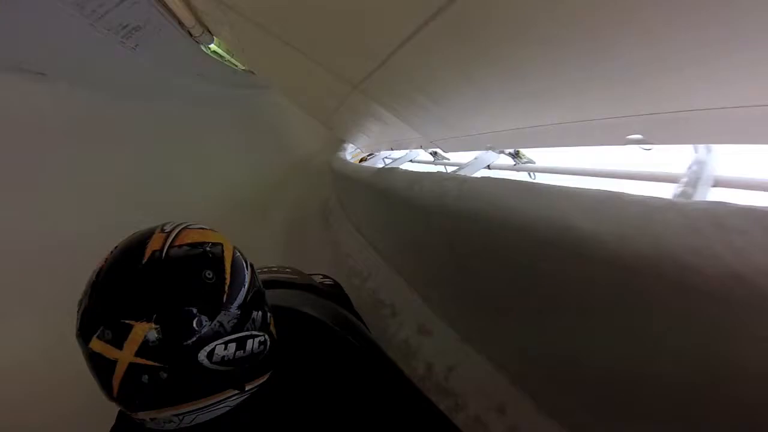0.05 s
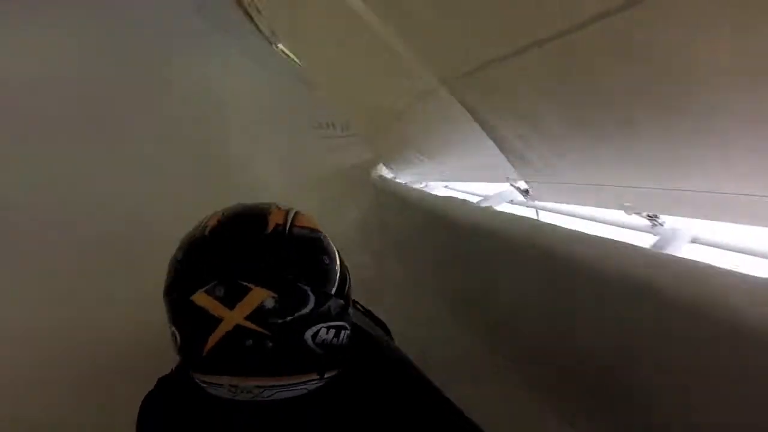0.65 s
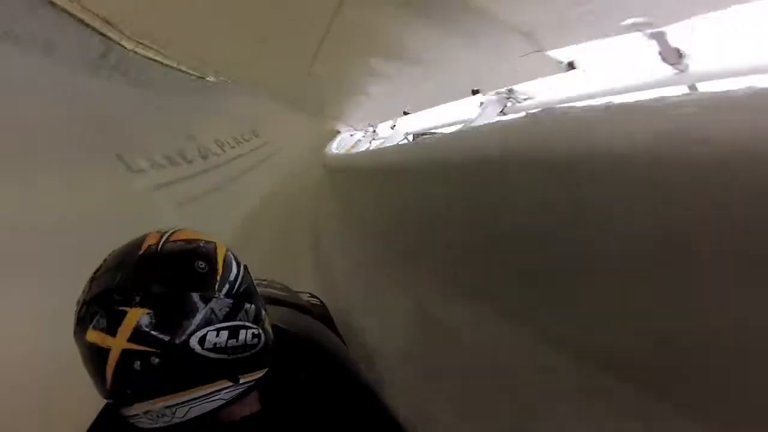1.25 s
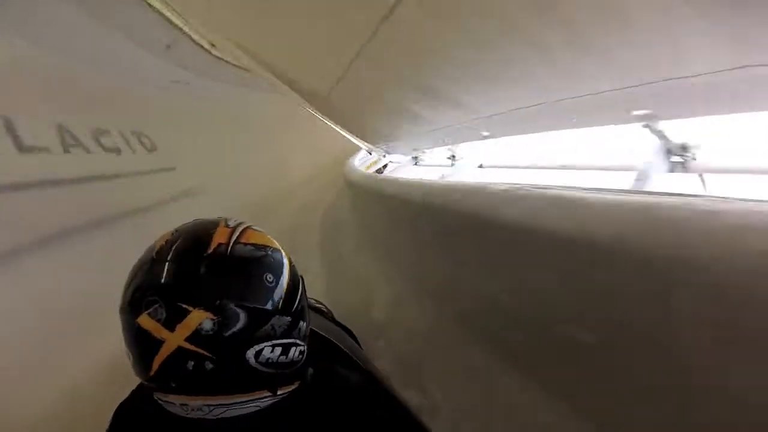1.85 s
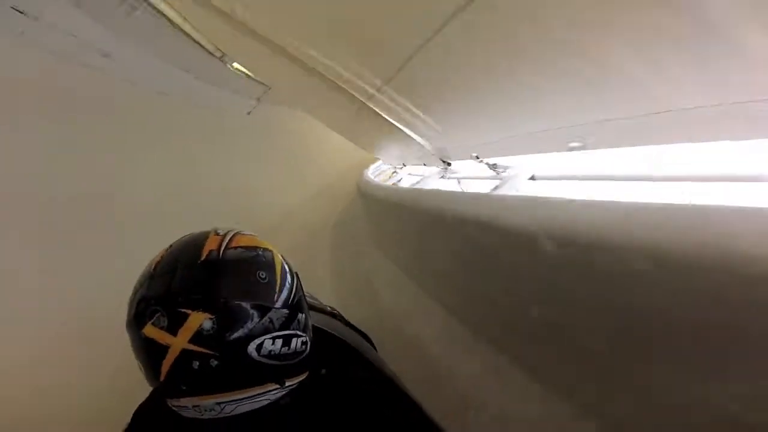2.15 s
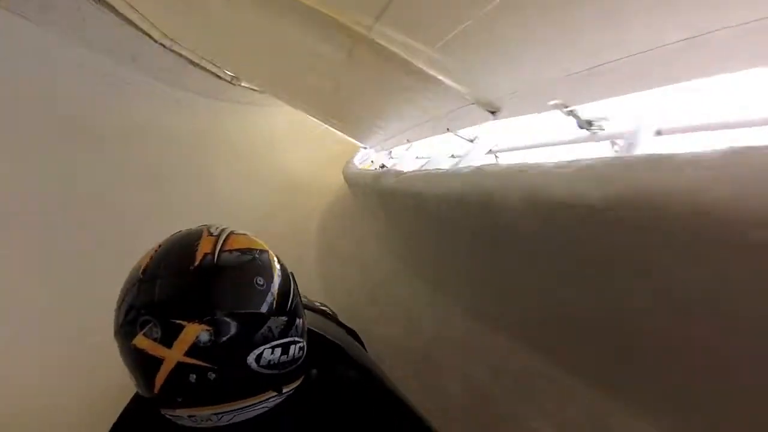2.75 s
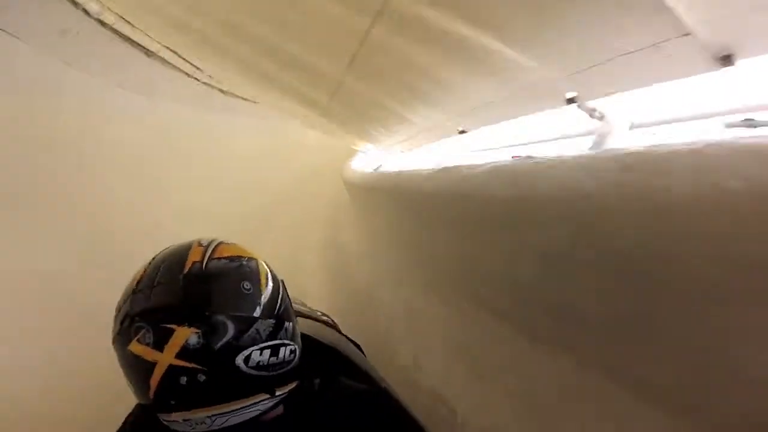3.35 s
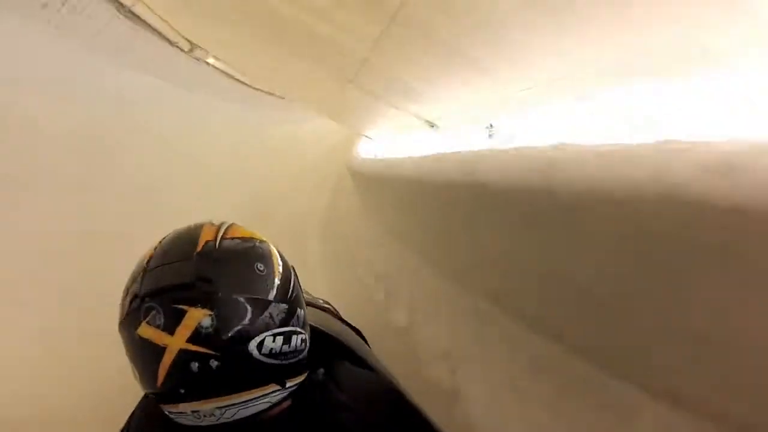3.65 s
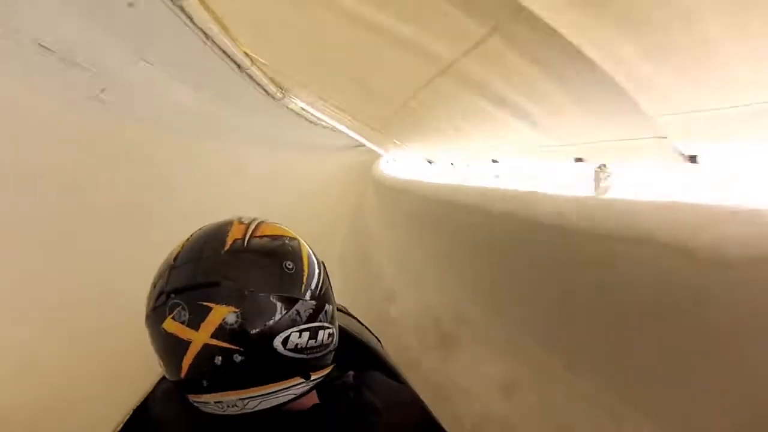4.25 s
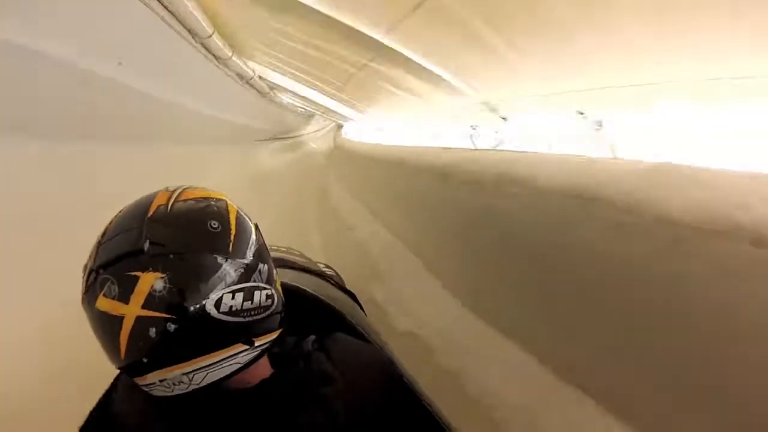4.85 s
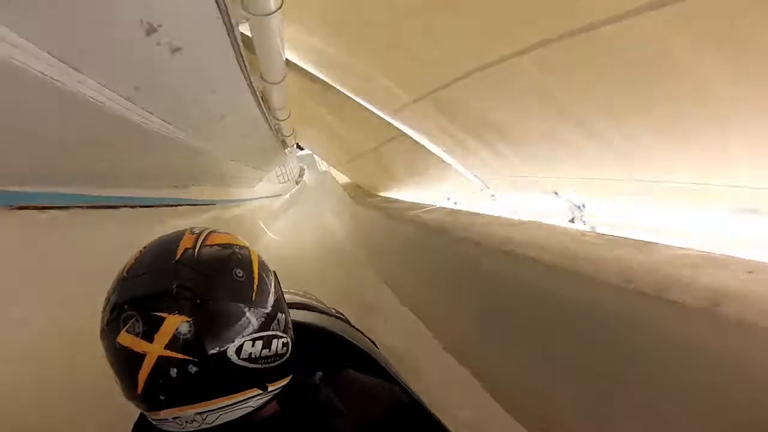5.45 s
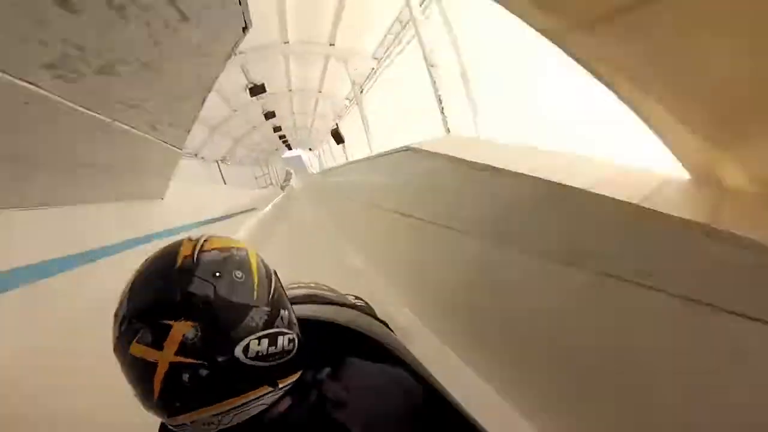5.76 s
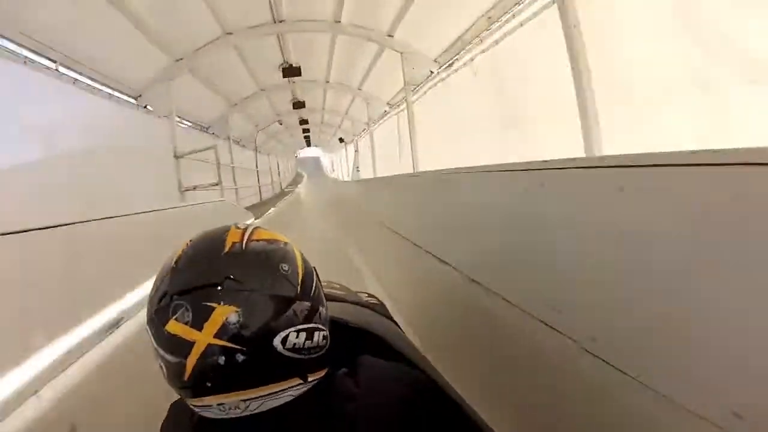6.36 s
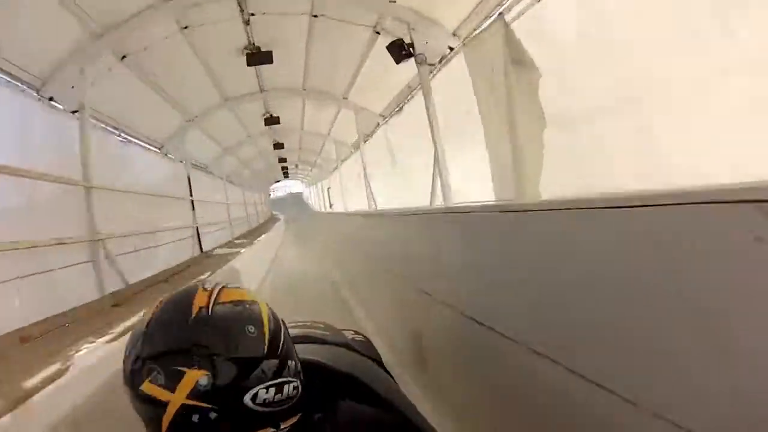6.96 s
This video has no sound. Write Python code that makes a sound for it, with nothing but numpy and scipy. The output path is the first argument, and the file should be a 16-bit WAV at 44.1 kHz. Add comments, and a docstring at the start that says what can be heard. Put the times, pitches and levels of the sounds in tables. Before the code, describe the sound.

A bobsled runs down an icy track, steel runners grinding and skidding over a low rumble, with rattles and heavy thumps in the second half.

```python
"""An iced bobsled track, heard from a camera on the running sled. Steel runners grind over the ice, skid,
squeal and make the shell ring; ice chips tick on the blades. Loose fittings rattle; the hull sways, heaves and
rumbles in the airstream. From 3 s on, bumps jolt the sled, and the ice sounds and buffet dip after them. The
camera's gain ducks after loud peaks."""
import sys
import numpy as np
from scipy import signal
from scipy.fft import rfft, irfft, next_fast_len
from scipy.io import wavfile
from scipy.ndimage import uniform_filter1d, minimum_filter1d, map_coordinates

SR = 44100
rng = np.random.default_rng(int(sys.argv[2]) if len(sys.argv) > 2 else 0)


def put_to_file(sound):
    """Save the sound as 16-bit audio at rate SR, in the file named by the first command-line argument."""
    columns = np.atleast_2d(sound).T  # one column per channel
    safe = np.clip(columns, -1, 1)
    whole_steps = np.round(safe * 32767)
    wavfile.write(sys.argv[1], SR, whole_steps.astype(np.int16))


N = 308700
T = np.arange(N) / SR
FFT_SIZE = next_fast_len(N + SR // 2, real=True)
HZ = np.fft.rfftfreq(FFT_SIZE, 1 / SR)

# steady glide: t/s, shell ring/dB, ice hiss/dB
GLIDE_LEVELS = [(0, -39.5, -42), (.4, -33.5, -37.5), (.7, -38, -43.5), (1.5, -40.5, -47), (2.25, -38, -44),
                (2.9, -37.5, -43.5), (3.5, -36, -40), (3.8, -38, -45), (4.3, -32.5, -35.5), (5, -34.5, -37),
                (5.6, -32.5, -35), (6.1, -37.5, -37.5), (6.6, -30.5, -33.5), (7, -38, -40)]
# shell modes: f/Hz, width/Hz, level/dB
SHELL_MODES = [(889, 12, -6.5), (1161, 85, -7.5), (1401, 245, -2.5), (1561, 208, 1.5), (1900, 474, -8),
               (2296, 240, -5), (2788, 112, -15)]
# steel runner modes: f/Hz, width/Hz, lift/dB
RUNNER_MODES = [(3680, 1360, 7.2), (4920, 305, 11.5), (5390, 96, 6.5), (6720, 580, 9), (7990, 750, 5.4),
                (11860, 140, 2.8)]
# shaved ice: f/Hz, level/dB
ICE_SPECTRUM = [(150, 12.5), (350, 6), (600, 1.5), (1000, 5), (2400, 9), (3000, 0.5), (4300, -4.5),
                (6000, -10), (8200, -14.5), (9500, -21), (13000, -24.5), (15500, -39)]
# fine spray re ice hiss: t/s, level/dB
SPRAY_LEVELS = [(0, -27), (.35, -21), (.5, -17), (.8, -18), (1.1, -20), (2.3, -19), (4.3, -21.5),
                (4.9, -19), (5.6, -19.5), (6.4, -15), (7, -14.5)]
# fine spray: f/Hz, level/dB
SPRAY_SPECTRUM = [(5000, -38), (7500, 8.5), (8800, 3), (10000, -1.5), (12000, 0.5), (15000, -18)]
# rumble, swelling with speed and load: t/s, sway/dB, buffet/dB
RUMBLE_LEVELS = [(0, -13, -30.5), (.28, -28, -30), (.85, -23, -29.5), (1.15, -34.5, -32.5),
                 (1.6, -29.5, -32.5), (2.15, -26, -30), (2.75, -27.5, -32), (3.1, -27.5, -32.5),
                 (3.8, -22.5, -29.5), (5, -26.5, -28), (5.6, -20.5, -27), (7, -20, -25.5)]
# hull sway: f/Hz, level/dB
SWAY_SPECTRUM = [(8, -14), (20, -10), (29, -6.5), (36, 2), (45, -10), (62, -29.5), (110, -69), (250, -76)]
# airstream buffet: f/Hz, level/dB
BUFFET_SPECTRUM = [(30, 4), (58, -5), (76, -1.5), (98, -4), (130, 2.5), (160, -4), (215, -9.5),
                   (290, -18.5), (450, -22.5), (900, -23), (3000, -55)]
# hull heaves over soft dips: crest t/s, level/dB
HULL_HEAVES = [(.11, -17), (.39, -18), (.62, -17.5), (.98, -20), (1.25, -24.5), (1.87, -22), (2.17, -19),
               (2.47, -21), (2.89, -21), (3.23, -17.5), (3.41, -19.5), (3.96, -18), (4.25, -29), (4.7, -22)]
# blade edge ring: t/s, level/dB
SIZZLE_LEVELS = [(0, -77), (1.4, -81), (1.85, -69), (2.4, -80), (3.6, -69), (4.7, -67), (5.3, -78)]
# knocks of loose fittings: t/s, strength/dB
FITTING_KNOCKS = [(.1351, -23), (.2244, -17), (0.2947, -23), (.465, -23), (.4916, -22), (1.5943, -22),
                  (1.881, -22), (2.051, -17), (2.3064, -10.5), (2.405, -20), (2.617, -16), (2.8529, -20.5),
                  (2.9645, -13), (3.049, -13.5), (3.2745, -23.5), (3.3523, -14.5), (3.5356, -17.5),
                  (3.649, -19.5), (3.751, -20.5), (4.011, -24), (4.4036, -6), (4.775, -21), (4.8543, -17.5),
                  (5.0437, -14), (5.2855, -17.5), (5.464, -14), (5.9836, -19), (6.2644, -22)]
# fitting modes: f/Hz, level/dB
FITTING_MODES = [(1450, -6), (1560, 11), (2000, -1.5), (2320, -1)]
# sideways skids: t/s, length/s, shell ring/dB, shaving/dB
RUNNER_SKIDS = [(0.286, .055, -25.5, -28), (0.372, 0.043, -32, -44), (0.482, 0.049, -26.5, -31),
                (1.363, 0.024, -36, -35.5), (2.301, 0.046, -33, -32.5), (2.476, 0.02, -32.5, -34),
                (2.521, 0.084, -42, -36), (2.76, 0.14, -39, -39.5), (2.931, 0.019, -28.5, -28.5),
                (2.964, 0.059, -25.5, -32.5), (3.047, 0.013, -30, -30), (3.162, 0.028, -32.5, -32.5),
                (3.356, 0.019, -20, -19), (3.903, .04, -28, -36), (4.009, 0.046, -23, -29.5),
                (4.395, 0.079, -25, -29.5), (4.715, 0.036, -33, -34), (4.769, 0.035, -22.5, -29),
                (5.027, 0.116, -27.5, -32), (5.283, 0.018, -36, -35), (5.345, 0.11, -25, -28),
                (5.459, 0.034, -38, -26.5), (5.67, 0.032, -28.5, -29.5), (5.788, 0.073, -29, -31.5),
                (5.94, 0.04, -31, -37.5), (6.17, 0.091, -34, -38), (6.492, 0.074, -27, -28),
                (6.657, 0.13, -31.5, -31)]
# a blade sticks and sings: t/s, f/Hz, level/dB, length/s
BLADE_SQUEALS = [(0.294, 5100, -39, .032), (.51, 8150, -46.5, 0.061), (1.363, 4930, -43, 0.048),
                 (2.296, 6160, -45, 0.059), (2.321, 4880, -33.5, .022), (2.948, 5408, -39, 0.082),
                 (3.04, 11900, -52.5, .026), (3.351, 6900, -35, 0.039), (4.455, 6700, -41.5, 0.054),
                 (5.356, 5020, -31.5, 0.03), (5.466, 6500, -43.5, 0.029)]
# track bumps: t/s, level/dB, contact/s, dip afterwards/dB
BUMPS = [(3.059, -1, 0.0011, 9.5), (3.198, -8, .0019, 5.5), (3.402, -17.5, 0.00087, -2.5),
         (3.785, -3, 0.0013, 2.5), (3.929, -12, 0.0046, 2.5), (4.103, -5.5, 0.0026, 8.5),
         (4.24, -8.5, .0044, 5.5), (4.526, -3.5, 0.0015, 7.5), (4.8572, 0.5, 0.0017, 3),
         (5.155, -1.5, 0.0015, 9), (5.426, -14, 0.0015, 2.5), (5.477, -8.5, 0.0026, 2),
         (5.5771, -4.5, 0.0018, 4.5), (5.707, -9, 0.0042, 3.5), (5.8675, -5, 0.0034, 1.5),
         (6.0071, -4, 0.0017, 8.5), (6.27, -4.5, 0.0016, 5), (6.3888, -5.5, 0.0014, 3.5),
         (6.591, -4.5, 0.0023, 0), (6.750, -2.5, 0.0014, 15.5), (6.9176, -5, 0.0013, 8.5)]
# hull modes, heave first, then panels: f/Hz, width/Hz, level/dB
HULL_MODES = [(39.6, 10.2, 7), (77, 25, 2.5), (123.3, 52, 8), (206, 42, -7), (495, 320, -12)]
# ticks on the camera housing: t/s, level/dB
HOUSING_TICKS = [(4.238, -36), (5.7076, -19), (6.747, -27), (6.751, -34)]
# housing tick: f/Hz, level/dB
TICK_SPECTRUM = [(1000, -28), (4500, -3), (9500, -12.5), (11200, -5.5), (12400, -2), (13300, -14),
                 (15500, -24)]


def amp(db):
    """Decibels to gain."""
    return 10 ** (np.asarray(db) / 20)


def unit(x):
    """Scale to rms 1."""
    return x / np.sqrt(np.mean(x ** 2) + 1e-20)


def curves(rows):
    """One value per sample for each column after the time."""
    times_s, *columns = np.transpose(rows)
    return [np.interp(T, times_s, column) for column in columns]


def wobble(rate_hz):
    """Smooth random curve, rate_hz knots a second."""
    return map_coordinates(rng.standard_normal(int(N * rate_hz / SR) + 4), [T * rate_hz])


def colour(spectrum):
    """Gain of an (f/Hz, level/dB) table, interpolated over log f."""
    hz, db = np.transpose(spectrum)
    return amp(np.interp(np.log(HZ + 1), np.log(hz), db))


def resonance(hz, width_hz):
    """Causal response of one damped mode."""
    return 1j * HZ * width_hz / (hz * hz - HZ * HZ + 1j * HZ * width_hz)


def body(modes):
    """Response of a set of modes; neighbours swing in antiphase."""
    return sum((-1) ** k * amp(db) * resonance(hz, width_hz)
               for k, (hz, width_hz, db) in enumerate(modes))


def filtered(x, response):
    """x through a frequency response."""
    return irfft(rfft(x, FFT_SIZE) * response, FFT_SIZE)[:N]


def noise(response):
    """White noise through a frequency response."""
    return filtered(rng.standard_normal(N), response)


def steadied(x, give):
    """Flatten the envelope of x, more so for small give; rms 1."""
    analytic = signal.hilbert(x, FFT_SIZE)[:N]
    envelope = np.abs(analytic)
    return unit(analytic.real / (envelope + give * envelope.mean()))


def add(track, at_s, sound):
    """Mix sound into track from at_s on."""
    part = track[max(round(at_s * SR), 0):][:len(sound)]
    part += sound[:len(part)]


def grit(rate_hz, spread_db=0):
    """Random impacts of ice grains; spread_db widens their range of sizes."""
    hits = rng.random(N) < rate_hz / SR
    return unit(hits * rng.standard_normal(N) * amp(spread_db * rng.standard_normal(N)))


def ice_colour():
    """Spectrum of shaved ice, lifted at the runner modes."""
    lifts = [1 + (amp(db) - 1) * resonance(hz, width_hz) for hz, width_hz, db in RUNNER_MODES]
    return colour(ICE_SPECTRUM) * np.prod(lifts, axis=0)


def ice_cut():
    """Gain of all ice cutting, glide plus skids."""
    _, hiss_db = curves(GLIDE_LEVELS)
    _, shaving_gain = skid_pressure()
    return np.hypot(amp(hiss_db), shaving_gain)


def runners(ridge_rate_hz=35, ridge_decay_s=0.013):
    """Runners chatter over rough ice: grains ring the shell, hiss at the blade and spray off."""
    ring_db, hiss_db = curves(GLIDE_LEVELS)
    spray_db, = curves(SPRAY_LEVELS)
    chatter = wobble(60)
    ridges = (rng.random(N) < ridge_rate_hz / SR) * rng.uniform(0.47, 1, N)
    bite = 1 + 0.3 * signal.lfilter([1], [1, -np.exp(-1 / (ridge_decay_s * SR))], ridges)
    ring_grains = grit(rate_hz=3500) * bite * amp(0.21 * chatter)
    hiss_grains = grit(rate_hz=9000) * np.sqrt(bite) * amp(0.59 * chatter + 0.79 * wobble(55))
    spray_grains = grit(rate_hz=6800, spread_db=1) * amp(2.7 * wobble(45))
    ring = unit(filtered(ring_grains, body(SHELL_MODES)))
    hiss = unit(filtered(hiss_grains, ice_colour()))
    spray = unit(filtered(spray_grains, colour(SPRAY_SPECTRUM)))
    return amp(ring_db) * ring + amp(hiss_db) * hiss + ice_cut() * amp(spray_db) * spray


def rumble(heave_s=0.14, drum_db=-1):
    """The hull sways and heaves on its runners; the airstream buffets it and skids drum on it."""
    sway_db, buffet_db = curves(RUMBLE_LEVELS)
    heave = np.zeros(N)
    for crest_s, db in HULL_HEAVES:
        add(heave, crest_s - heave_s / 2, amp(db) * signal.windows.hann(int(heave_s * SR)))
    sway = steadied(noise(colour(SWAY_SPECTRUM)), give=1)
    gusts = rng.standard_normal(N) * amp(2.5 * wobble(22))
    buffet = unit(filtered(gusts, colour(BUFFET_SPECTRUM)))
    ring_gain, _ = skid_pressure()
    drumming = amp(drum_db) * ring_gain
    return np.hypot(amp(sway_db), heave) * sway + np.hypot(amp(buffet_db), drumming) * buffet * duck_after_bumps()


def sizzle():
    """A blade edge rings thinly, coming and going with the ice."""
    level_db, = curves(SIZZLE_LEVELS)
    edge = noise(resonance(hz=12030, width_hz=300) ** 2)
    return amp(level_db) * unit(edge * amp(4.3 * wobble(28)))


def chips(count=260, rise_s=0.00054, t60_s=0.029):
    """Loose ice chips tick against the blades; small ones sound higher and fainter."""
    out = np.zeros(N)
    t = T[:SR // 40]
    envelope = (1 - np.exp(-t / rise_s)) * amp(-60 * t / t60_s)
    for when, pitch, softness in rng.random((count, 3)):
        hz = 5000 + 8000 * pitch
        db = -1.5 - 13 * pitch - 8 * softness
        add(out, when * N / SR, amp(db) * envelope * np.sin(2 * np.pi * hz * t))
    return ice_cut() * out


def faint_knocks(count, over_ring_db=8.5):
    """Small ridges jog the fittings at random, harder in a rough glide. Rows: t/s, strength/dB."""
    times_s, ring_db, _ = np.transpose(GLIDE_LEVELS)
    last_s = T[-SR // 10]
    return [(when * last_s, np.interp(when * T[-1], times_s, ring_db) + over_ring_db + 5 * size)
            for when, size in rng.random((count, 2))]


def rattles(rise_s=0.001, ring_t60_s=0.055, buzz_t60_s=0.084):
    """A ridge scuffs a runner; a loose fitting strikes, rings and buzzes against the shell."""
    out = np.zeros(N)
    buzz = steadied(noise(body(SHELL_MODES)), give=0.47)
    scuff = unit(noise(ice_colour()))
    rasp = buzz + amp(-9.5) * scuff
    t = T[:SR // 12]
    attack = 1 - np.exp(-t / rise_s)
    for at_s, db in list(FITTING_KNOCKS) + faint_knocks(count=20):
        ring = np.zeros(len(t))
        for hz, mode_db in FITTING_MODES:  # each contact reweights and detunes the modes
            gain = amp(mode_db + rng.normal(0, 5.4))
            ring += gain * np.sin(2 * np.pi * (hz * rng.normal(1, 0.02) * t + rng.random()))
        # little play: hard knocks ring no louder but buzz more
        strike = amp(min(db - 8, -16) - 60 * t / ring_t60_s) * unit(ring)
        chatter = amp(db - 9 - 60 * t / buzz_t60_s) * rasp[int(at_s * SR):][:len(t)]
        add(out, at_s, attack * (strike + chatter))
    return out


def skid_pressure(bite_share=0.18, sag_db=2.5, release_s=0.024):
    """Gains of shell ring and shaving: each skid bites, sags as it grips and lets go."""
    ring_gain, shaving_gain = np.zeros(N), np.zeros(N)
    t = T[:SR // 2]
    for at_s, length_s, ring_db, shaving_db in RUNNER_SKIDS:
        bite = 1 - np.exp(-t / (bite_share * length_s))
        sag = amp(-sag_db * np.minimum(t / length_s, 1))
        release = np.exp(-np.maximum(t - length_s, 0) / release_s)
        envelope = bite * sag * release
        add(ring_gain, at_s, amp(ring_db) * envelope)
        add(shaving_gain, at_s, amp(shaving_db) * envelope)
    return ring_gain, shaving_gain


def glinting(x, spread_db=3):
    """Brief rings at shifting pitches stand out of x as the contact moves along a blade; rms 1."""
    spectra = signal.stft(x, nperseg=512)[2]
    patches = uniform_filter1d(rng.standard_normal(spectra.shape), size=3, axis=0)
    patches = uniform_filter1d(patches, size=4, axis=1)
    return unit(signal.istft(spectra * amp(spread_db * unit(patches)), nperseg=512)[1][:N])


def skids():
    """A runner judders sideways: it shaves ice, rings the shell and crunches through the hull."""
    ring_gain, shaving_gain = skid_pressure()
    shaving = glinting(noise(ice_colour()))
    ring = glinting(filtered(grit(rate_hz=2500, spread_db=2.5), body(SHELL_MODES)))
    crunch = unit(noise(resonance(hz=560, width_hz=350)))
    judder = unit(amp(1.92 * wobble(120)))
    return judder * (ring_gain * ring + shaving_gain * (shaving + amp(-14.5) * crunch))


def squeals():
    """Stick-slip drives one blade mode; the ring keeps breaking off and restarting."""
    out = np.zeros(N)
    slips = wobble(380) + 1j * wobble(380)
    for at_s, hz, db, length_s in BLADE_SQUEALS:
        n = int(length_s * SR)
        ring = np.real(slips[int(at_s * SR):][:n] * np.exp(2j * np.pi * hz * T[:n]))
        add(out, at_s, amp(db) * signal.windows.hann(n) * ring)
    return out


def jolts(foot_ahead_s=0.01933, foot_db=-8.5, foot_contact_s=0.0042, crack_t60_s=0.028):
    """A bump pushes the hull softly, then hard. Short contacts thud higher; hard ones crack the joints."""
    out, strain = np.zeros(N), np.zeros(N)
    heave, *panels = [amp(db) * resonance(hz, width_hz) for hz, width_hz, db in HULL_MODES]
    ring = irfft(sum(panels) - heave, FFT_SIZE)[:SR // 4]  # panels spring out against the heave
    lead_s = 0.02
    from_peak_s = T[:round(2 * lead_s * SR)] - lead_s
    feet = [(at_s - foot_ahead_s, db + foot_db, foot_contact_s) for at_s, db, *_ in BUMPS]
    for at_s, db, contact_s, *_ in feet + list(BUMPS):
        push = 1 / np.cosh(2 * from_peak_s / contact_s)
        thud = signal.fftconvolve(ring, push)
        add(out, at_s - lead_s, amp(db) * thud / np.abs(thud).max())
        add(strain, at_s, amp(2 * db - 60 * T[:SR // 20] / crack_t60_s))
    cracks = amp(-27) * strain * unit(noise(ice_colour()))
    return out + cracks


def duck_after_bumps(delay_s=0.0054, rise_s=0.005, settle_s=0.096):
    """Gain that ducks a moment after each bump, then recovers."""
    dip_db = np.zeros(N)
    t = T[:SR // 2]
    shape = (1 - np.exp(-t / rise_s)) * np.exp(-(t / settle_s) ** 2)
    for at_s, _, _, after_db in BUMPS:
        add(dip_db, at_s + delay_s, after_db * shape)
    return amp(-dip_db)


def ticks(length_s=0.003):
    """Short, bright scratches on the camera housing."""
    envelope = np.zeros(N)
    burst = signal.windows.hann(int(length_s * SR))
    for at_s, db in HOUSING_TICKS:
        add(envelope, at_s, amp(db) * burst)
    return envelope * steadied(noise(colour(TICK_SPECTRUM)), give=1)


def gain_control(x, threshold_db, slope, hold_s, lag_s):
    """Peaks over the threshold pull the gain down a moment later; it holds, then recovers."""
    wanted_db = -slope * np.maximum(20 * np.log10(np.abs(x) + 1e-9) - threshold_db, 0)
    window = 2 * int(hold_s * SR / 2) + 1
    held_db = minimum_filter1d(wanted_db, window, origin=window // 2)
    pole = np.exp(-1 / (lag_s * SR))
    return x * amp(signal.lfilter([1 - pole], [1, -pole], held_db))


def scene():
    """Mono mix on board; the ice sounds duck after each bump."""
    ice = duck_after_bumps() * (runners() + skids() + chips() + sizzle())
    return (ice + squeals() + rattles() + rumble() + jolts() + ticks())[None]


def record(dry):
    """The camera ducks after loud peaks, soft-clips and band-limits."""
    ceiling, top_hz = 0.96, 15400
    ducked = gain_control(dry[0], threshold_db=-2, slope=2.4, hold_s=0.029, lag_s=0.0034)
    rounded = ducked / (1 + (ducked / ceiling) ** 8) ** (1 / 8)
    return filtered(rounded, HZ < top_hz)[None]


dry = scene()
out = record(dry)
put_to_file(out)
```